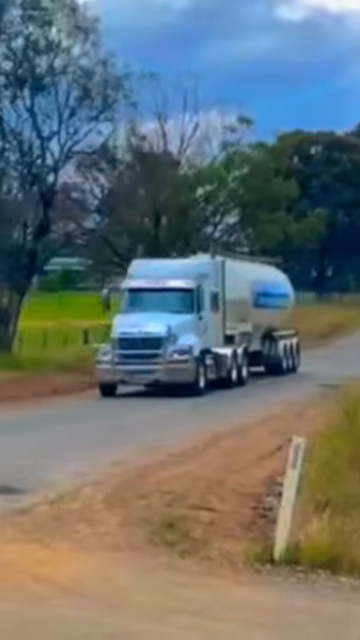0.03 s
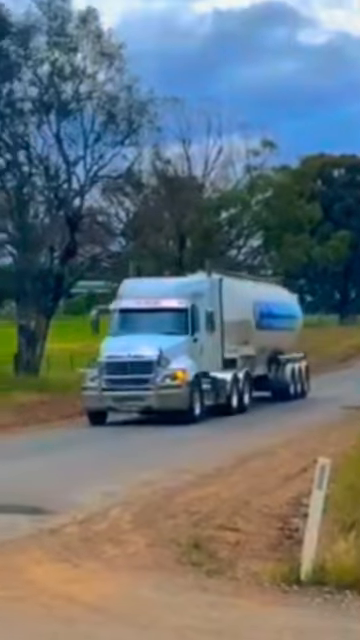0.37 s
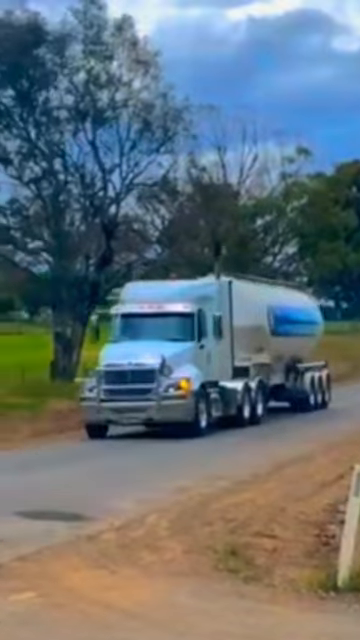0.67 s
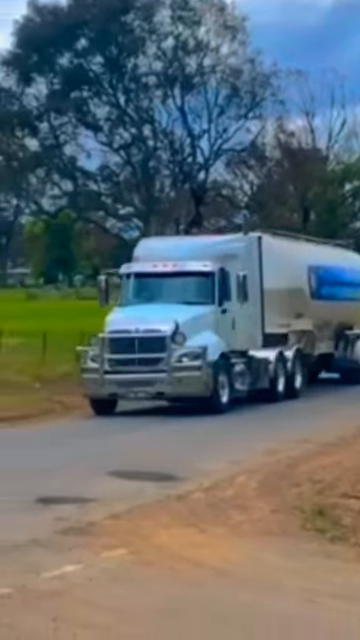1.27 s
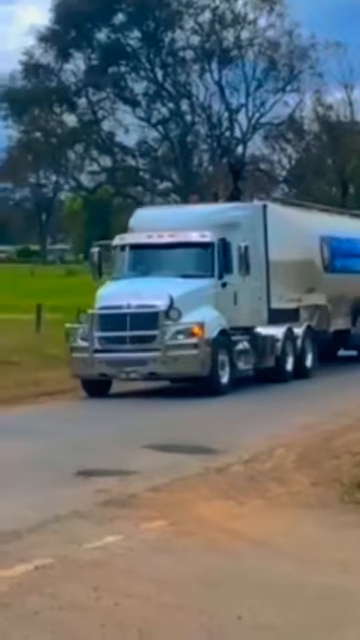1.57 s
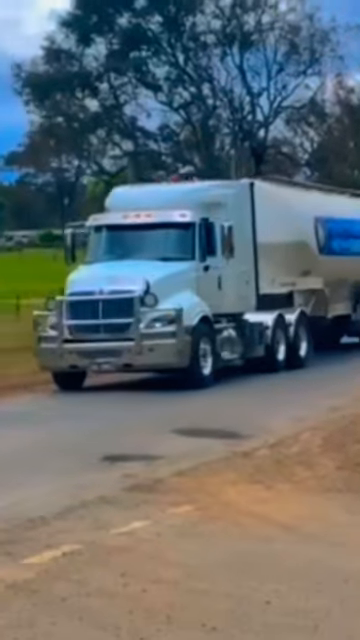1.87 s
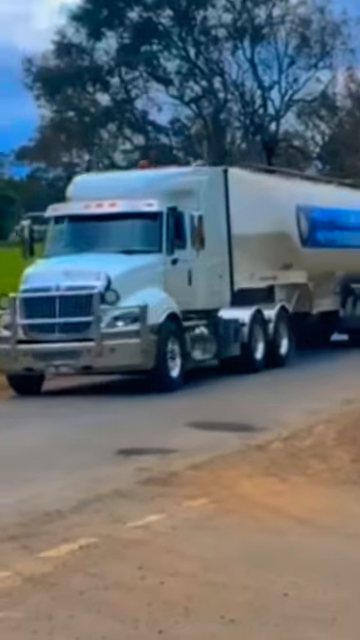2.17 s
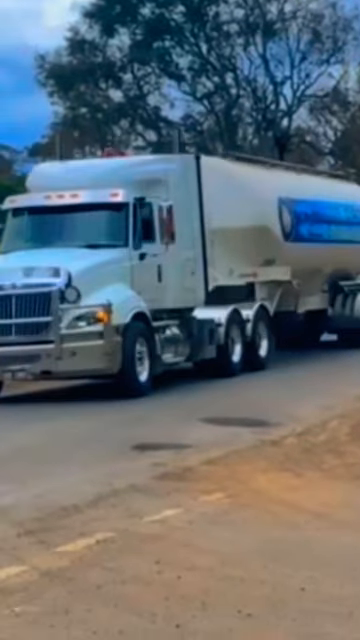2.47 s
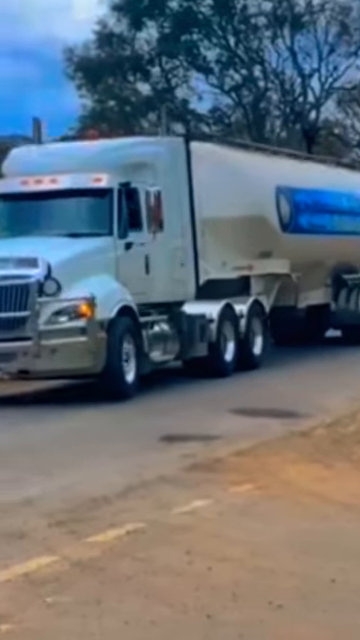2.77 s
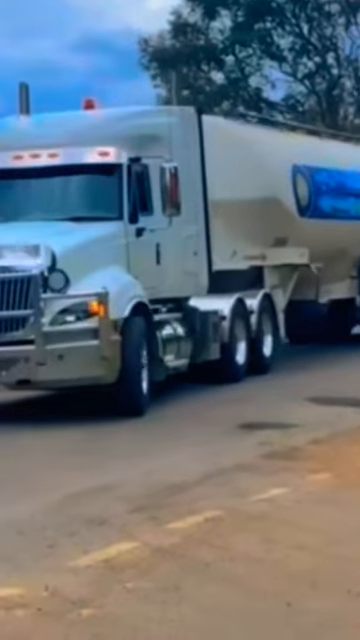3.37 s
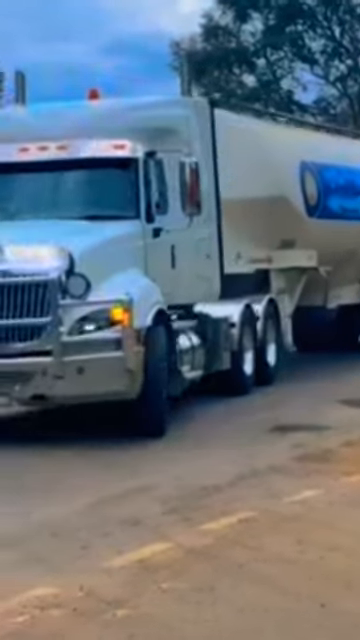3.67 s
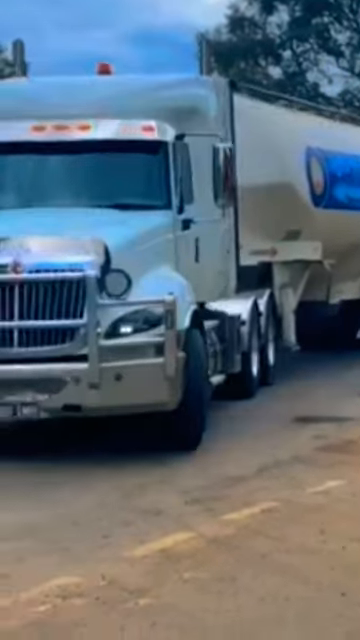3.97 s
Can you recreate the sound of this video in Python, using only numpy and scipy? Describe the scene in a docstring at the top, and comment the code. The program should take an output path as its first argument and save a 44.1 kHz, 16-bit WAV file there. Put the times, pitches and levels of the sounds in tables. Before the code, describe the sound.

A heavy truck's low exhaust burble falls in pitch over tyre rush as it slows.

```python
"""A low exhaust burble falls in pitch and cuts out just before 3 s: a tanker truck is slowing on its
engine brake near a rural junction. Six cylinders release gas in turn, and each firing rings the block.
Tyres and fan rush throughout, with a brief gear whine, faint turbo whistles and a spell of escaping air.
Friction draws thin squeals from the wheel brakes, and the trailer coupling clunks as the truck turns in."""
import sys
import numpy as np
from scipy import signal
from scipy.fft import rfft, irfft, next_fast_len
from scipy.io import wavfile
from scipy.ndimage import uniform_filter1d, map_coordinates

SR = 44100
rng = np.random.default_rng(int(sys.argv[2]) if len(sys.argv) > 2 else 0)


def unload_wav(signal):
    """Save mono or channel-first audio to the path in sys.argv[1] as 16-bit WAV at rate SR, clipped to [-1, 1]."""
    wavfile.write(
        sys.argv[1],
        SR,
        np.round(np.clip(np.atleast_2d(signal).T, -1, 1) * 32767).astype(np.int16),
    )


N = 176400

# The slowing engine. Each row: time in seconds, firing rate in Hz, levels of harmonics 1 to 5 in dB.
ENGINE_RUN = [(0.0, 71.84, -57, -18.5, -37, -33.5, -31.5), (0.06, 71.64, -32, -16.5, -27.5, -26.5, -32),
              (0.34, 69.22, -28, -20, -24.5, -31.5, -30), (0.65, 65.82, -34, -23, -31.5, -27.5, -37),
              (0.76, 64.58, -26, -24.5, -29, -35, -32), (1.19, 60.73, -21.5, -32, -23, -32.5, -37),
              (1.29, 59.6, -19, -26.5, -22, -36, -38), (1.47, 57.66, -21, -32, -24, -31.5, -31),
              (1.82, 54.77, -24.5, -30, -32.5, -38.5, -37.5), (2.16, 51.68, -20.5, -28.5, -24, -29, -41),
              (2.43, 49.39, -24.5, -27, -16.5, -29.5, -64), (2.66, 47.3, -24.5, -21.5, -23, -38, -41),
              (2.73, 46.34, -24.5, -24.5, -25.5, -55, -50), (2.83, 45.95, -24, -37, -26.5, -27.5, -54),
              (2.9, 44.9, -24, -36, -29.5, -43, -54)]


def amp(db):
    """Amplitude ratio of a level in decibels."""
    return 10 ** (np.asarray(db) / 20)


def unit(x):
    """Normalisation to an rms of 1."""
    return x / np.sqrt(np.mean(x ** 2) + 1e-20)


def clock():
    """Time of each sample in seconds."""
    return np.arange(N) / SR


def along(points, hz):
    """Interpolation of (Hz, value) points on a logarithmic frequency axis."""
    f, v = np.transpose(points)
    return np.interp(np.log(hz + 1), np.log(f + 1), v)


def curves(rows):
    """Linear interpolation in time: one value per sample for each column after the first."""
    times, *columns = np.transpose(rows)
    return [np.interp(clock(), times, column) for column in columns]


def wobble(rate):
    """Smooth random modulation: a spline through `rate` Gaussian values a second."""
    return map_coordinates(rng.standard_normal(N // 10), [clock() * rate], mode="mirror")


def fuzz(width_hz):
    """Line broadening: a random complex envelope that spreads a tone into a narrow band."""
    return wobble(width_hz) + 1j * wobble(width_hz)


def swell(start, end, edge):
    """Trapezoidal envelope: rise, hold and fall, with times in seconds."""
    return np.clip(np.minimum(clock() - start, end - clock()) / edge, 0, 1)


def pulsation(cycles, depth):
    """Periodic amplitude modulation: a gain that peaks once a cycle."""
    return np.exp(depth * np.cos(2 * np.pi * cycles))


def filtered(x, response):
    """Linear filtering: the spectrum of x is multiplied by a frequency response."""
    size = next_fast_len(N + SR // 2)
    return irfft(rfft(x, size) * response(np.fft.rfftfreq(size, 1 / SR)), size)[..., :N]


def resonance(hz, centre_hz, width_hz):
    """Complex band-pass response of a damped oscillator."""
    return 1j * hz * width_hz / (centre_hz ** 2 - hz * hz + 1j * hz * width_hz)


def stereo_noise():
    """Partial coherence: white noise, alike on both sides in the bass and diffuse in the treble."""
    # Each row: frequency in Hz, correlation of left and right.
    coherence = [(100, 0.99), (300, 0.97), (600, 0.86), (1200, 0.9), (2200, 0.67), (4000, 0.096),
                 (8000, 0.23), (13000, 0.14)]

    def mid_side_gains(hz):
        angle = np.arccos(np.clip(along(coherence, hz), -1, 1)) / 2
        return np.array([np.cos(angle), np.sin(angle)])

    mid, side = filtered(rng.standard_normal((2, N)), mid_side_gains)
    return np.array([mid + side, mid - side])


def rush(spectrum, gate=1):
    """Source and filter: gated stereo noise, coloured by a spectrum, at an rms of 1."""
    return unit(filtered(stereo_noise() * gate, lambda hz: amp(along(spectrum, hz))))


def patchy(x, patchy_db):
    """Turbulence: the gain varies at random in patches of time and frequency."""
    spectra = signal.stft(x, nperseg=512)[2]
    field = uniform_filter1d(rng.standard_normal(spectra.shape[1:]), size=3, axis=0)
    field = uniform_filter1d(field, size=14, axis=1)
    return unit(signal.istft(spectra * amp(patchy_db * unit(field)), nperseg=512)[1][:, :N])


def exhaust(firing_hz, firings):
    """Periodic gas release gives harmonics and puffs of noise; unequal cylinders add lines between."""
    # Lines of unequal cylinders, and the sixth firing harmonic.
    # Each row: multiple of the crank rate, level in dB ahead of stack and muffler.
    crank_lines = [(2, -49), (5, -37), (7, -45), (8, -42.5), (11, -41.5), (13, -44), (14, -43), (16, -47.5),
                   (17, -57), (18, -40.5)]
    # Spectrum of the gas puffs. Each row: frequency in Hz, relative level in dB.
    puff_spectrum = [(25, -46), (45, -7.5), (300, -3), (400, -6.5), (490, -21.5), (590, -8.5), (670, -13),
                     (780, -12), (950, -22), (2000, -44)]
    # Strength of puffs and rasp. Each row: time in seconds, base level in dB.
    puff_levels = [(0, -27.5), (1.4, -30.5), (2.9, -37.5)]
    brake_off_s, release_s = 2.9, 0.058
    stack = lambda hz: 1 + 6.3 * resonance(hz, centre_hz=147.4, width_hz=9)
    muffler = lambda hz: 1 - resonance(hz, centre_hz=78.6, width_hz=13)
    tones = np.zeros(N)
    for k, db in enumerate(curves(ENGINE_RUN)[1:], 1):
        stack_phase = np.angle(stack(k * firing_hz))
        tones += np.sqrt(2) * amp(db) * np.cos(2 * np.pi * k * firings + stack_phase)
    for order, db in crank_lines:
        k = order / 3  # three firings per turn of the crank
        cycles = k * firings + 0.5 * rng.random()
        line = stack(k * firing_hz) * muffler(k * firing_hz) * np.exp(2j * np.pi * cycles)
        tones += np.sqrt(2) * amp(db + 1.5 * wobble(5.08)) * line.real
    tones *= amp(0.2 * wobble(55))  # strokes differ slightly in strength
    puff_db, = curves(puff_levels)
    rasp_db = puff_db - 6 + 0.06 * (firing_hz - 61)  # upper crank lines rasp more at speed
    for k in np.arange(19, 48) / 3:
        db = rasp_db + along(puff_spectrum, k * firing_hz) + 4.5 * wobble(2.79)
        tones += amp(db) * np.cos(2 * np.pi * (k * firings + rng.random()))
    puffs = amp(puff_db - 3.5) * rush(puff_spectrum, pulsation(firings, depth=0.29))
    return (tones + puffs) * np.clip(1 - (clock() - brake_off_s) / release_s, 0, 1)


def engine_block(firings):
    """Forced vibration: each firing shakes the block's modes, which throb on every second firing."""
    # Resonances of the block. Each row: frequency in Hz, width in Hz.
    modes = [(1046.3, 42), (1290, 37), (1270, 156)]
    # Each row: time in seconds, level of each of the three modes in dB.
    mode_levels = [(0, -43.5, -42, -38), (.7, -41, -38.5, -40.5), (.87, -42.5, -34, -45),
                   (1.18, -32, -39.5, -36), (1.3, -38.5, -42.5, -37.5), (2.12, -40.5, -39, -38),
                   (2.24, -39, -49, -32), (2.33, -40.5, -36.5, -43), (2.75, -40, -44, -47),
                   (2.95, -70, -49, -57)]
    shake = pulsation(firings, depth=0.41)
    throb = pulsation(firings / 2, depth=0.5)
    out = np.zeros(N)
    for (hz, width_hz), db in zip(modes, curves(mode_levels)):
        force = shake * rng.standard_normal(N)
        ring = signal.hilbert(filtered(force, lambda f: resonance(f, hz, width_hz) ** 2))
        steadier_ring = ring.real / np.sqrt(np.abs(ring) + 1e-20)
        out += amp(db) * unit(throb * steadier_ring)
    return out


def gear_whine(firings):
    """Tooth meshing: a pure tone geared to the crank falls with it and soon fades."""
    teeth_per_firing, end_s, fade_s = 8.5, 0.64, 0.22
    fade = np.clip((end_s - clock()) / fade_s, 0, 1)
    return amp(-37) * fade * np.sqrt(2) * np.cos(2 * np.pi * teeth_per_firing * firings)


def road_noise():
    """Broadband noise: the running gear rumbles, tyres and fan roar, and a gritty hiss lies on top."""
    # Spectra of the three bands. Each row: frequency in Hz, relative level in dB.
    rumble_spectrum = [(22, -33), (45, -5), (87, 1), (143, -2), (175, -5), (330, -7), (440, -16.5),
                       (700, -50)]
    roar_spectrum = [(250, -40), (440, -13.5), (560, -5.5), (760, -8), (920, -14), (1080, -10),
                     (1450, -13.5), (1750, -12), (2150, -16), (2600, -20), (3000, -30.5), (4000, -55)]
    hiss_spectrum = [(1500, -22), (2500, -5.5), (3200, -1.5), (3850, 2), (5000, 1.5), (7600, -5),
                     (9400, -2), (13200, -4.5), (15000, -26)]
    # Their envelopes. Each row: time in seconds, level in dB.
    rumble_levels = [(0, -33), (2.8, -31.5), (3.1, -34), (4, -33.5)]
    roar_levels = [(0, -35), (.8, -35), (1.4, -33), (2, -32.5), (2.8, -31.5), (3.2, -34.5), (4, -29.5)]
    hiss_levels = [(0, -45), (1, -43.5), (2.2, -44), (2.87, -43), (3.1, -50.5), (3.3, -43), (3.43, -47.5),
                   (3.53, -41), (3.69, -49.5), (3.86, -39.5)]
    roar_db = curves(roar_levels)[0] + 0.27 * wobble(21.4)
    roar = amp(roar_db) * patchy(rush(roar_spectrum), patchy_db=2.0)
    hiss_db = curves(hiss_levels)[0] + 0.89 * wobble(34.88)
    grit = amp(0.71 * wobble(700))
    hiss = amp(hiss_db) * patchy(rush(hiss_spectrum, grit), patchy_db=2.3)
    rumble = amp(curves(rumble_levels)[0]) * rush(rumble_spectrum)
    return rumble + roar + hiss


def turbo_whistles():
    """Narrow-band flow noise: turbo and intake give faint, gliding whistles that come and go."""
    # Each row: start and length in seconds, first and last pitch in Hz, level in dB, width in Hz.
    whistles = [(0, 0.62, 3900, 3850, -56, 171), (0.493, 0.52, 3910, 3880, -52, 110),
                (1.1, 0.62, 4970, 5000, -50, 260), (2.391, 0.1644, 2880, 2840, -43, 159.5),
                (2.547, 0.38, 2590, 2565, -45.5, 170)]
    out = np.zeros((2, N))
    for start, length, first_hz, last_hz, db, width_hz in whistles:
        pitch_hz = np.interp(clock(), [start, start + length], [first_hz, last_hz])
        carrier = np.exp(2j * np.pi * np.cumsum(pitch_hz) / SR)
        flutter = np.array([fuzz(width_hz) for side in "LR"])
        out += amp(db) * swell(start, start + length, edge=0.062) * (flutter * carrier).real
    return out


def brake_squeals():
    """Friction-excited vibration: the linings catch in short, fuzzy squeals on two high modes."""
    # Each row: start and length in seconds, first and last pitch in Hz, level in dB (upper mode).
    squeals = [(0.042, 0.076, 13300, 13300, -51), (2.566, 0.085, 13100, 12630, -47),
               (2.641, 0.15, 13800, 13100, -43), (2.736, .13, 13200, 13550, -48.5),
               (2.873, 0.15, 13400, 13160, -44.5), (3.142, 0.052, 14000, 13600, -38.5),
               (3.221, 0.14, 14000, 13400, -42.5), (3.271, 0.034, 13160, 12900, -26),
               (3.286, 0.25, 13000, 13300, -45.5), (3.57, 0.11, 13300, 13100, -54),
               (3.473, .1, 13300, 13500, -36.5), (3.723, 0.046, 13000, 12800, -45)]
    width_hz, low_mode_ratio, low_mode_db = 430, 0.705, -13.5
    # Each mode flutters partly in common and partly on each side alone.
    high, low = [common + 0.72 * np.array([fuzz(width_hz) for side in "LR"])
                 for common in (fuzz(width_hz), fuzz(width_hz))]
    t = clock()
    out = np.zeros((2, N))
    for start, length, first_hz, last_hz, db in squeals:
        on = (t > start) & (t < start + length)
        pitch_hz = first_hz + (last_hz - first_hz) * (t[on] - start) / length
        phase = 2 * np.pi * np.cumsum(pitch_hz) / SR
        high_mode = high[:, on] * np.exp(1j * phase)
        low_mode = amp(low_mode_db) * low[:, on] * np.exp(1j * low_mode_ratio * phase)
        envelope = amp(db) * swell(start, start + length, edge=0.033)[on]
        out[:, on] += envelope * (high_mode + low_mode).real
    return out


def escaping_air():
    """Turbulent flow: escaping air makes a short, uneven hiss."""
    # Each row: frequency in Hz, relative level in dB.
    air_spectrum = [(2300, -16), (2750, 6.5), (3400, -3), (5000, -5), (6500, -4.5), (8000, -9.5),
                    (14000, -15)]
    envelope = amp(-42) * swell(start=1.055, end=1.787, edge=0.17)
    return envelope * patchy(rush(air_spectrum), patchy_db=4.5)


def trailer_clunks():
    """Impact excitation: slack in the coupling closes with a scrape and bounces that ring the steel."""
    # Knocks of the coupling. Each row: start in seconds, base level in dB.
    knocks = [(3.831, -31), (3.89, -20.5), (3.93, -31), (3.96, -33), (3.987, -26)]
    # Spectrum of the scrape, then modes of the steel. Each row: frequency in Hz, relative level in dB.
    scrape_spectrum = [(350, -14), (620, 0), (1200, 3.5), (2400, -3.5), (3300, -22), (4500, -15.5),
                       (15000, -31)]
    steel_modes = [(675, -0.5), (834, -1), (1044, -1), (1630, -3), (2440, -9.5)]
    scrape_db, attack_s, hold_s, scrape_t60_s = -1.5, 0.002, 0.016, 0.05
    steel_db, steel_t60_s, bounce_s = -7.5, 0.079, 0.006
    contact, ring = np.zeros(N), np.zeros(N)
    for start, db in knocks:
        age = clock() - start
        attack = np.clip(age / attack_s, 0, 1)
        contact += attack * amp(db - 60 * np.maximum(age - hold_s, 0) / scrape_t60_s)
        for delay in np.arange(3) * bounce_s:
            ring_age = age[age > delay] - delay
            for hz, mode_db in steel_modes:
                decay = amp(db + steel_db + mode_db - 60 * ring_age / steel_t60_s)
                ring[N - len(ring_age):] += decay * np.sin(2 * np.pi * (hz * ring_age + rng.random()))
    grit = amp(2.3 * wobble(400))
    return ring + amp(scrape_db) * contact * rush(scrape_spectrum, grit)


def stereo_image(truck):
    """Localisation cues: the right side is slightly louder and the left leads in phase."""
    # Each row: frequency in Hz, excess of right over left in dB.
    balance = [(50, 1), (140, 2.1), (2000, 2), (8000, 0.5)]
    # Each row: frequency in Hz, lead of the left side in radians.
    phase_lead = [(0, 0.049), (600, 0.25), (2300, 0.74), (4000, 2.4), (9400, 0.57), (13000, 0.57)]
    side = np.array([[-0.5], [0.5]])

    def response(hz):
        lead = np.interp(hz, *np.transpose(phase_lead))
        return amp(side * along(balance, hz)) * np.exp(-1j * side * lead)

    return filtered(truck, response)


def scene():
    """Superposition of all sources; one running count of firings keeps exhaust, block and gear in step."""
    firing_hz = curves(ENGINE_RUN)[0]
    speed_jitter = 0.0011 * wobble(15.27)
    firings = np.cumsum(firing_hz * (1 + speed_jitter)) / SR
    engine = exhaust(firing_hz, firings) + engine_block(firings) + gear_whine(firings)
    truck = engine + road_noise() + escaping_air() + turbo_whistles()
    return stereo_image(truck + brake_squeals() + trailer_clunks())


def record(dry):
    """Frequency response: the microphone dips in the high treble and passes nothing above its band."""
    # Each row: frequency in Hz, gain in dB.
    treble_dip = [(10500, 0), (11700, -24.5), (12700, 0.5)]
    band_limit_hz = 15450
    return filtered(dry, lambda hz: amp(along(treble_dip, hz)) * (hz < band_limit_hz))


dry = scene()
out = record(dry)
unload_wav(out)
```